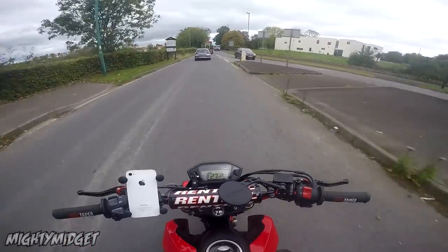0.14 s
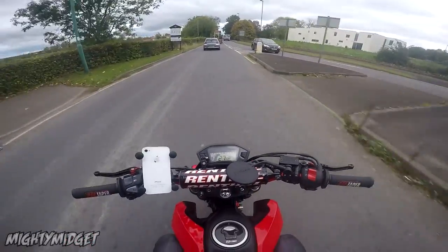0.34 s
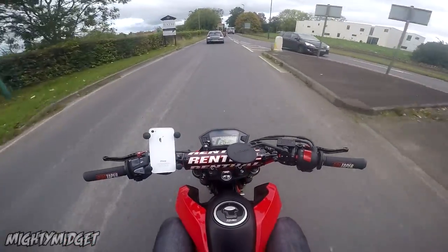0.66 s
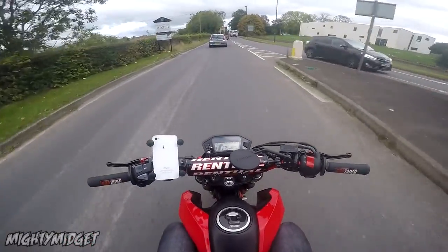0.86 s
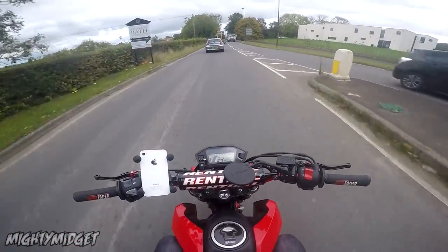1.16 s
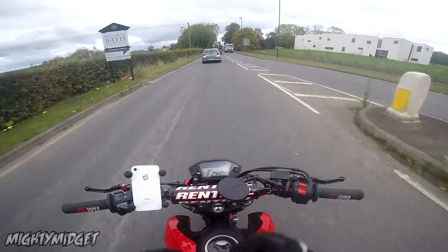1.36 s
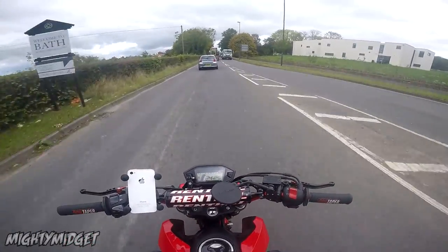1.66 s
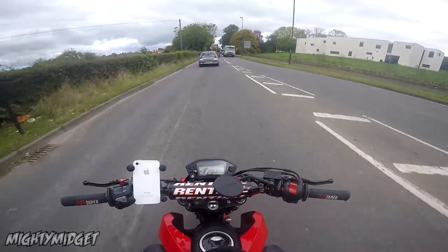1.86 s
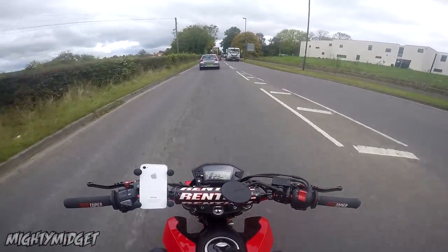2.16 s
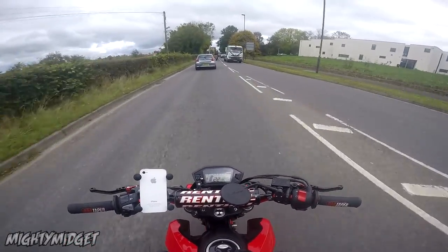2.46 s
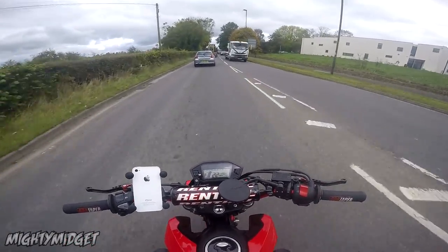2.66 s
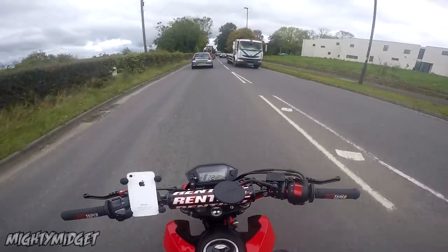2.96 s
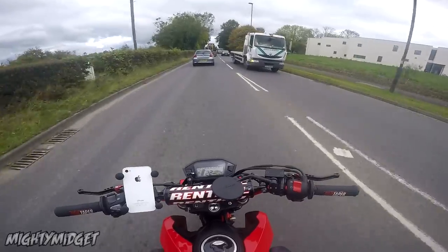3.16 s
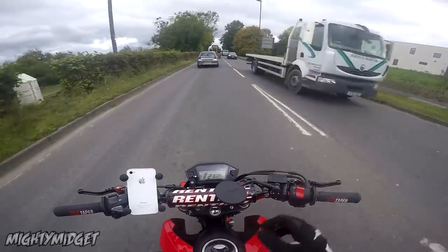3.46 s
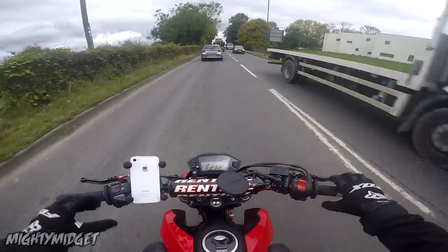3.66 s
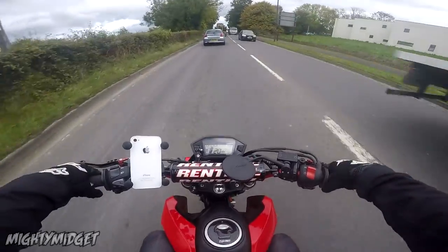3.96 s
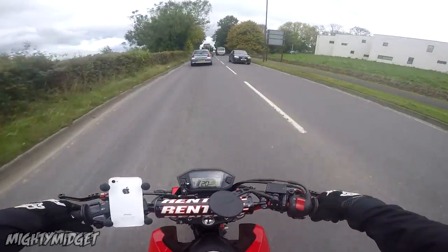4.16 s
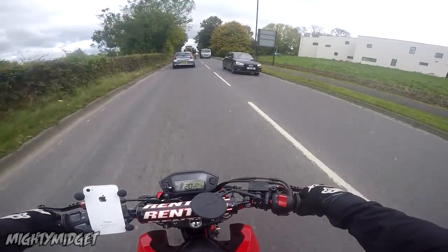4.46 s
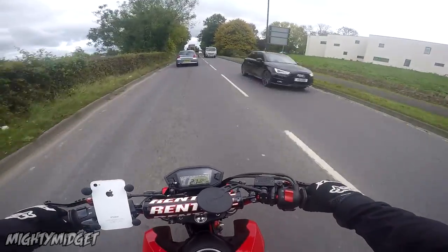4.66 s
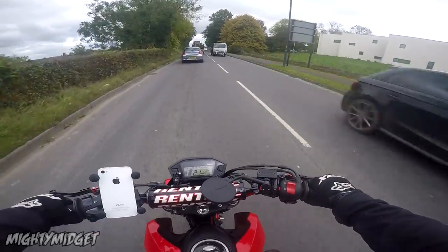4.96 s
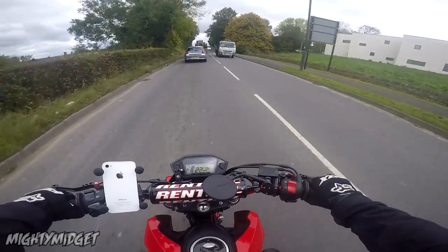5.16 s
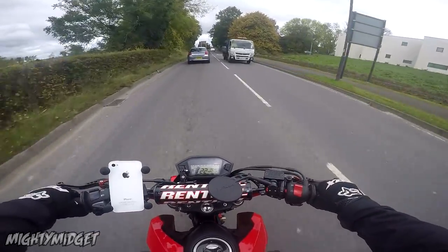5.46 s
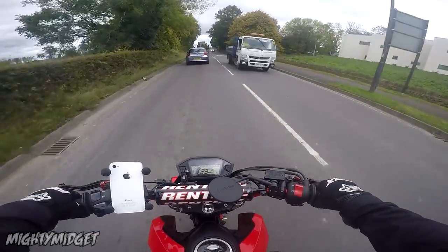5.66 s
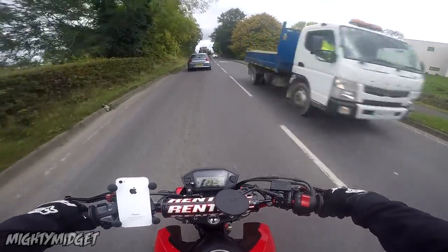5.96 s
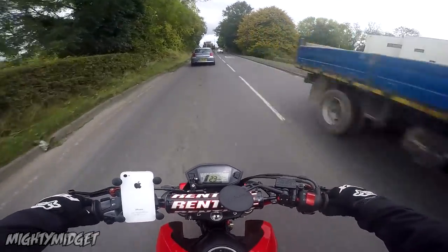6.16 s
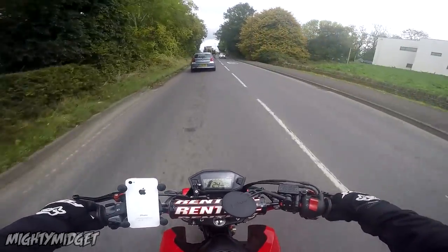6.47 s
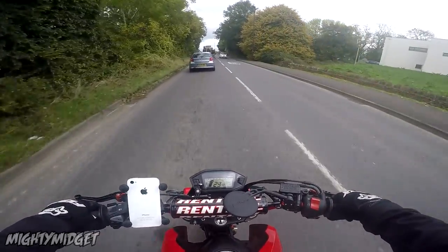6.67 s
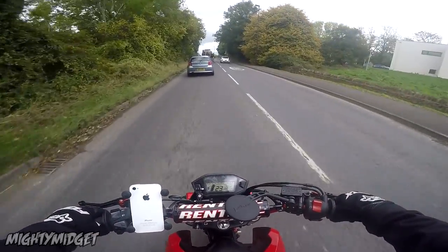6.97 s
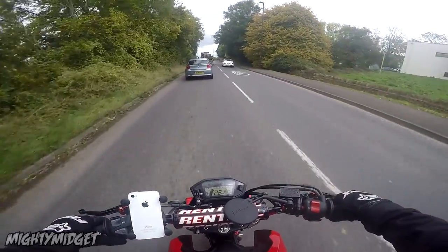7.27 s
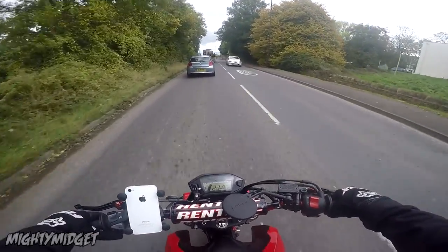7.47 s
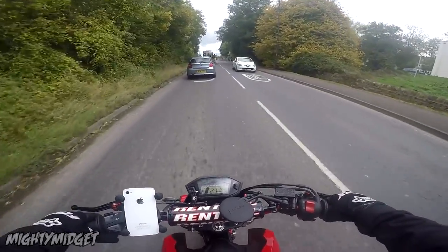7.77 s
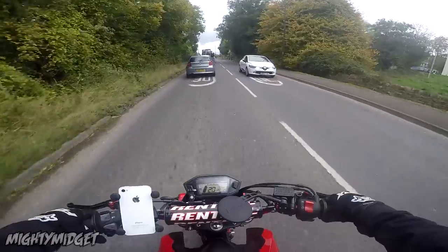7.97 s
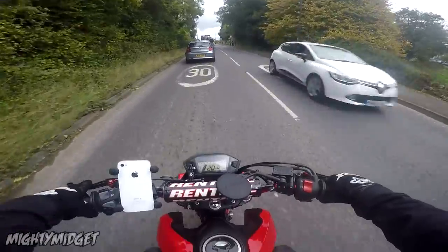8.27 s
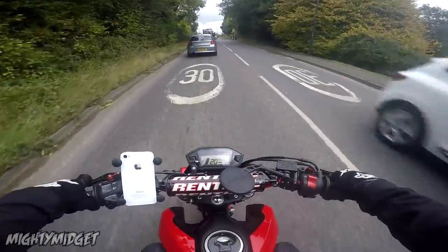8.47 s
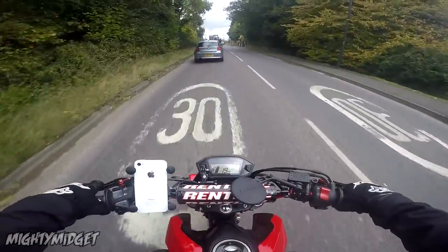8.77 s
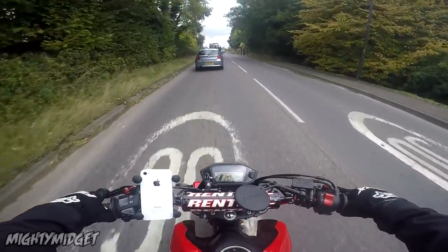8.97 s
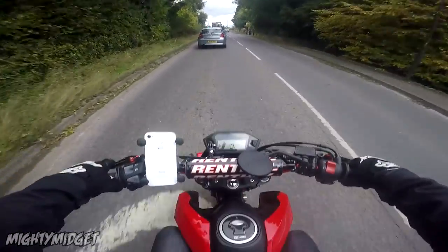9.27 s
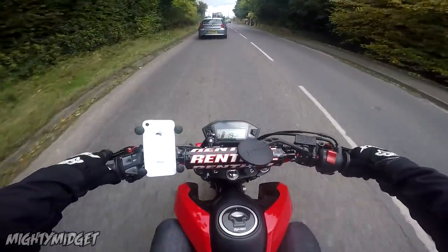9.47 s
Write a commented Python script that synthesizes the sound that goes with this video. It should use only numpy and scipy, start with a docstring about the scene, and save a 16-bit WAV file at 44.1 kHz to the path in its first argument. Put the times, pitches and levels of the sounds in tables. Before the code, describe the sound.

Onboard a small single-cylinder motorcycle with a loud pipe, outdoors on a road. From 0 to about 1.3 s it coasts with dense, cracking exhaust pops and strong low wind buffeting. Engine speed sags until 4.5 s, settling into hollow low thumps with scattered duller pops; gloves and jacket rustle on the left, mostly between 1.4 and 3.5 s. A vehicle whooshes past on the right around 3.7 s. At 4.55 s the throttle opens with a jerk: a hard, barking, raspy pull climbs in pitch until about 5.95 s, with a passing car near 5.1 s. It shuts off into burbling, popping overrun as another vehicle passes at 6.1 s. Speed falls until 8.4 s, one more car swishing by at 8.3 s. Short throttle blips at 8.4 and 8.65 s lead into a gentler pull to the end at 9.6 s. Tyre and air noise continue throughout.

```python
"""Small motorcycle, rider's ear

A single-cylinder engine with a loud pipe coasts, pulls hard, coasts and picks up again.
Each cycle thumps the pipe; firings and late-burn pops ring its modes, hiss gas and overload the microphones.
Shaped noise makes road, wind, oncoming vehicles, intake rasp and cloth rustle; a sine makes the gear whine."""
import sys
import numpy as np
from scipy import signal
from scipy.fft import rfft, irfft
from scipy.io import wavfile
from scipy.ndimage import uniform_filter1d

SR = 44100
rng = np.random.default_rng(int(sys.argv[2]) if len(sys.argv) > 2 else 0)


def wav_record(signal):
    """Record a signal, one row per channel, as 16-bit PCM in the file named by sys.argv[1]."""
    frames = np.transpose(np.atleast_2d(signal))
    bounded = np.clip(frames, -1, 1)
    # unit amplitude maps onto the largest positive 16-bit level
    quanta = np.round(bounded * 32767).astype(np.int16)
    wavfile.write(sys.argv[1], SR, quanta)


def natural_amplitude(level_db):
    """Convert a level in decibels to a linear amplitude factor, elementwise."""
    exponent = np.asarray(level_db, float) / 20
    return 10 ** exponent


N = 424240
TIME = np.arange(N) / SR
CRUISE_HZ = 27  # reference engine speed, cycles per s
FIRING_FLOOR_DB = -30  # weaker than this counts as shut throttle


def colour(x, points):
    """Shape noise by (frequency [Hz], relative level [dB]) points; rms 1."""
    hz, db = np.transpose(points)
    bins_hz = np.maximum(np.arange(N // 2 + 1) * SR / N, 1)
    y = irfft(rfft(x) * natural_amplitude(np.interp(np.log(bins_hz), np.log(hz), db)), N)
    return y / y.std()


def both(left, right, alike):
    """Two channels that share a part of their noise."""
    return np.array([left, alike * left + np.sqrt(1 - min(alike, 1) ** 2) * right])


def stereo_noise(points, alike):
    """Coloured noise in two partly shared channels."""
    left, right = (colour(rng.standard_normal(N), points) for _ in range(2))
    return both(left, right, alike)


def walk(rate_hz):
    """Random levels held 1 / rate_hz and slewed twice; spread near 1."""
    hold = int(SR / rate_hz)
    steps = np.repeat(rng.standard_normal(N // hold + 1), hold)
    return 1.3 * uniform_filter1d(uniform_filter1d(steps, hold), hold)[:N]


def pushes(times_s, sizes, push_ms):
    """A raised-cosine shove of gas centred on each time."""
    x, shape = np.zeros(N), np.hanning(int(push_ms * SR / 1000) + 3)
    at = (times_s * SR).astype(int)
    inside = (at >= 0) & (at < N)
    np.add.at(x, at[inside], sizes[inside])
    return signal.fftconvolve(x, shape / shape.sum(), "same")


def ring(x, hz, t60_s):
    """One decaying mode as radiated by an open end, which passes changes of flow only."""
    r, w = np.exp(-np.log(1000) / (t60_s * SR)), 2 * np.pi * hz / SR
    return signal.lfilter([1, -1], [1, -2 * r * np.cos(w), r * r], x)


def fade(x, fade_s):
    """Exponential tail after each push."""
    return signal.lfilter([1], [1, -np.exp(-1 / (fade_s * SR))], x)


# engine speed, sagging on coast, climbing under throttle: (time [s], speed [cycles/s])
SPEED_POINTS = [(0, 32.29), (.694, 30.52), (1.001, 29.4), (1.972, 27.55), (3.888, 24.66), (4.498, 23.88),
                (4.916, 25.23), (5.682, 28.27), (6.26, 28.12), (6.526, 27.13), (7.538, 24.82),
                (8.462, 23.51), (8.574, 22.5), (8.869, 24.71), (9.084, 22.9), (9.62, 23.55)]
# chain slack taken up with a jerk of the crank: (time [s], undamped swing [cycles/s])
CHAIN_SNATCHES = [(4.545, 8.46), (6.038, -8.92), (8.904, -4.78)]


def speed():
    """Cycles per second, with a quick damped swing at each snatch."""
    swing_hz, decay_s = 3.086, .048
    rate = np.interp(TIME, *np.transpose(SPEED_POINTS))
    for start_s, size in CHAIN_SNATCHES:
        since = np.maximum(TIME - start_s, 0)
        rate = rate + size * np.sin(2 * np.pi * swing_hz * since) * np.exp(-since / decay_s)
    return rate


def thump(cycle, rate, fire_db, pop, jitter_db):
    """Broad gas push every cycle, growing with speed and pops, softened by open throttle."""
    base_db, db_per_hz, open_db = -10, 0.37, -2.5
    level_db = base_db + db_per_hz * (np.interp(cycle, TIME, rate) - CRUISE_HZ)
    level_db = level_db + jitter_db + open_db * (fire_db > FIRING_FLOOR_DB)
    return pushes(cycle - .0062, natural_amplitude(level_db) * (1 + 2.6 * pop), push_ms=9.41)


# leftover fuel burning off throttle, louder cracks: (time [s], relative level [dB])
LOUD_POPS = [(.015, -15.5), (.077, -12.5), (.107, -15), (.233, -14), (.328, -13.5), (.361, -15),
             (.424, -11.5), (.52, -13), (.65, -15.5), (.683, -16.5), (.748, -13.5), (.782, -18),
             (.848, -14), (.95, -15), (1.051, -16.5), (1.084, -16), (1.153, -17.5), (1.292, -21),
             (1.536, -19), (1.677, -19.5), (2.0, -19), (2.11, -21.5), (2.22, -20), (2.332, -21.5),
             (2.444, -24), (2.593, -20), (2.82, -21.5), (3.204, -22), (3.439, -20), (3.719, -19),
             (3.799, -20), (4.043, -20.5), (5.999, -19.5), (6.222, -20.5), (6.397, -19), (6.55, -19),
             (6.731, -16), (6.847, -18), (7.0, -19.5), (7.151, -19.5), (7.231, -20), (7.712, -21),
             (7.834, -21), (8.082, -20.5), (8.205, -21.5), (8.249, -22), (8.461, -19.5), (8.592, -19.5),
             (8.635, -19.5)]


def late_burns(cycle, rate, fire_db, faint_jitter_db, stray_jitter_db):
    """Pop strength per cycle: most coasting cycles burn faintly, some catch late with a crack."""
    stray_share, stray_db, faint_db, faint_db_per_hz = .2, -21.5, -27, 0.6
    stray = rng.random(len(cycle)) < stray_share
    faint = faint_db + faint_db_per_hz * (np.interp(cycle, TIME, rate) - CRUISE_HZ) + faint_jitter_db
    pop = natural_amplitude(np.where(stray, stray_db + stray_jitter_db, faint))
    # a clean firing leaves no fuel behind
    pop *= (fire_db < FIRING_FLOOR_DB) & (np.roll(fire_db, 1) < FIRING_FLOOR_DB)
    for time_s, db in LOUD_POPS:
        pop[np.argmin(abs(cycle + .005 - time_s))] = natural_amplitude(db)
    return pop


# pipe modes, relative levels: (frequency [Hz], t60 [s], burn arrival [ms], thump [dB], firing [dB],
# pop [dB], right ear [dB], right ear lag [ms], growth [dB per dB of firing])
PIPE_MODES = [(55, 0.073, 0.12, -9, -36, -40.5, -3, .1, 0.5),
              (98.3, 0.054, 1.2, 12, -11.5, -20.5, -4.5, .1, 2),
              (141.6, 0.03, 0.55, -10.5, -0.5, -7, -1.5, .2, 2.5),
              (250.2, 0.027, 0.085, -18, 3, 5, -7, 0.1, 1.86),
              (305.1, 0.063, 0.54, -8, -13, -5, 1, 0.44, 4),
              (346.2, 0.068, 0.48, -25.5, -11, -19, -4, 0.63, 2),
              (453, 0.019, 0.71, -27, -3.5, -21, 0.5, 0.22, 7),
              (563, 0.038, 1.4, -28.5, -2, -6, -6.5, 0.26, 5.5),
              (697.4, 0.034, 3.16, -42, -22.5, -5, -6.5, 0.27, 2.5),
              (746, 0.035, 2.1, -42.5, -8, -14, -6.5, .4, 8),
              (860, 0.0068, 1.6, -47.5, -8, -28, -5, .4, 6.5),
              (1004, 0.034, 2.054, -32.5, -10, -10, -1, 0.63, 7.5),
              (1293, 0.039, 1.2, -46.5, -14.5, -19, -5, .4, 5.5),
              (1642, 0.012, 0.73, -54.5, -18, -26.5, -9, 0.1, 6)]


def pipe(cycle, firing, fire_db, pop, thumps):
    """Modes rung by thumps and pops, and apart by firings; stronger burns have steeper fronts."""
    pivot, bite = natural_amplitude(-17), 0.37  # bite: extra pop growth per octave, so bigger pops are brighter
    scatter_db = 2.3  # no two pops ring the modes alike
    out, fired = np.zeros((2, 2, N))
    for hz, t60_s, arrives_ms, thump_db, firing_db, pop_db, right_db, lag_ms, growth in PIPE_MODES:
        push_ms = min(620 / hz, 3.)  # low modes get a longer push
        lag, right = int(lag_ms * SR / 1000), natural_amplitude(right_db)
        fire = pushes(firing + arrives_ms / 1000, -natural_amplitude(fire_db * growth + 5.5), push_ms)
        power = max(1 + bite * np.log2(hz / 450), .5)
        scatter = natural_amplitude(scatter_db * rng.standard_normal(len(cycle)))
        pop_sizes = -1.9 * scatter * pivot * (pop / pivot) ** power
        pops = pushes(cycle - .0028 + 1.42 * arrives_ms / 1000, pop_sizes, push_ms)
        mode = ring(natural_amplitude(thump_db) * thumps + natural_amplitude(pop_db) * pops, hz, t60_s)
        bang = ring(natural_amplitude(firing_db) * fire, hz, t60_s)
        out += mode, right * np.roll(mode, lag)
        fired += bang, right * np.roll(bang, lag)
    return out, fired


def exhaust_gas(cycle, firing, fire_db, pop):
    """Hot gas hisses after the valve opens; late burns hiss duller, hard firings trail a rasp."""
    growth, fade_s, tail_s, pop_cutoff_hz = 6, .007, .015, 2500  # growth: dB per dB of firing
    jet = [(100, -13), (300, -4.0), (700, -0.5), (1500, -15.0), (1900, -22.0), (2600, -27.5),
           (3600, -39), (6000, -47.5), (16000, -81.0)]
    tail = [(500, -20), (1000, -0.5), (2000, -6.5), (3200, -16.5), (8000, -44.5)]
    blast = pushes(firing + 0.0036, natural_amplitude(growth * fire_db), push_ms=1.9)
    pop_blast = pushes(cycle + 0.0031, 0.96 * pop, push_ms=6.3)
    noise = stereo_noise(jet, alike=0.047)
    dull = signal.butter(2, pop_cutoff_hz, fs=SR, output="sos")
    gas = fade(blast, fade_s) * noise + signal.sosfilt(dull, fade(pop_blast, fade_s) * noise)
    gas = gas + natural_amplitude(-32) * fade(blast, tail_s) * stereo_noise(tail, alike=0.3)
    return natural_amplitude(-12.5) * gas


def gear_whine(phase):
    """Forty gear teeth meshing per cycle, as a wavering sine."""
    whine = natural_amplitude(-64 + 3 * walk(8)) * np.sin(2 * np.pi * 40 * phase)
    return whine * np.array([[1], [.3]])


def engine(rate):
    """Crank phase times every thump, pop and firing; the silencer filters the ringing pipe."""
    first_cycle, packing_hz = .35, 1660
    phase = np.cumsum(rate) / SR - first_cycle
    cycle = np.interp(np.arange(-1, int(phase[-1]) + 1), phase, TIME)
    fire_jitter, faint_jitter, jitter = rng.standard_normal((3, len(cycle))) * [[.2], [2.5], [.6]]  # dB
    firing = firing_times(cycle)
    fire_db = throttle_db(firing + 0.0018) + fire_jitter
    pop = late_burns(cycle, rate, fire_db, faint_jitter, jitter)
    thumps = thump(cycle, rate, fire_db, pop, jitter)
    out, fired = pipe(cycle, firing, fire_db, pop, thumps)
    packing = signal.butter(3, packing_hz, fs=SR, output="sos")  # silencer wool soaks up treble
    exhaust = signal.sosfilt(packing, out + cancel(fired))
    return exhaust + exhaust_gas(cycle, firing, fire_db, pop) + intake_rasp() + gear_whine(phase)


# tyre and air noise: (frequency [Hz], relative density [dB per Hz])
ROAD_COLOUR = [(45, -3), (100, -8.5), (220, -9), (450, -17.5), (700, -26), (1600, -40.5), (1900, -38.5),
               (2100, -44), (2350, -47), (2570, -49), (2800, -55), (3400, -54.5), (5000, -65.5),
               (9000, -73), (12500, -73.5), (16000, -83)]


def road(rate):
    """Tyre and air noise in four ranges that flutter apart and follow speed and load unequally."""
    db_per_hz, load_db, load_power = 0.64, 4.5, 6.4
    load = uniform_filter1d(natural_amplitude(throttle_db(TIME)) ** load_power, size=SR // 10)
    drive_db = db_per_hz * (rate - CRUISE_HZ) + load_db * load
    drive_db = drive_db - drive_db.mean()
    left, right = (colour(rng.standard_normal(N), ROAD_COLOUR) for _ in range(2))
    # (edges [Hz], channel likeness, flutter [dB], share of drive_db followed)
    ranges = [((40, 250), .8, 1.2, .2), ((250, 1200), .4, 1.2, .6),
              ((1200, 4500), .4, .8, .9), ((4500, 15500), .6, 2.2, .05)]
    out = 0
    for edges_hz, alike, flutter_db, follow in ranges:
        sos = signal.butter(2, edges_hz, "band", fs=SR, output="sos")
        band = signal.sosfilt(sos, both(left, right, alike))
        out = out + band * natural_amplitude(flutter_db * walk(13) + follow * drive_db)
    return natural_amplitude(-22.5) * out * natural_amplitude([[1.2], [-1.2]])


# wind on the microphones: (time [s], mean level [dB])
WIND_LEVEL = [(0, -26), (1.5, -42.5), (2.6, -40), (4.1, -41.5), (4.9, -32), (5.8, -32), (6.3, -40.5),
              (8.2, -36.5), (9.62, -42.5)]


def wind():
    """Slow buffeting straight on the microphones."""
    buffet = [(10, -3.5), (25, 13.0), (50, -1.5), (80, -28.5), (200, -56.5), (1500, -120)]
    level_db = np.interp(TIME, *np.transpose(WIND_LEVEL)) + 3.5 * walk(1.8)
    return natural_amplitude(level_db) * stereo_noise(buffet, alike=.6) * natural_amplitude([[-1], [1]])


# cloth on cloth, relative levels: (time [s], length [s], dull [dB], bright [dB])
CLOTH_RUBS = [(.03, .05, -62, -63), (.34, .03, -75, -71), (.49, .04, -75, -71), (1.41, .07, -68, -66),
              (1.53, .08, -59, -63), (1.64, .06, -62, -73), (1.78, .13, -66, -74), (2.01, .05, -65, -74),
              (2.14, .07, -73, -71), (2.3, 1.6, -73, -93), (2.49, .1, -63, -74), (2.65, .04, -65, -76),
              (2.8, .14, -67, -76), (2.95, .04, -64, -76), (3.0, .04, -62, -73), (3.12, .06, -61, -70),
              (3.22, .05, -65, -74), (3.45, .05, -72, -65), (3.82, .04, -74, -66), (7.0, .05, -78, -73),
              (7.31, .03, -68, -64), (8.07, .03, -78, -72)]


def rustle():
    """Grainy rubs of gloves and jacket, each a mix of a dull and a bright scratch."""
    dull = [(1200, -22), (2400, -2), (4000, 0), (5000, -6), (6000, -14), (9000, -26)]
    bright = [(3000, -25), (6000, -5), (10000, 0), (12500, -7), (16000, -14)]
    out = 0
    for column, shape in [(2, dull), (3, bright)]:
        rub = sum(natural_amplitude(row[column]) * np.exp(-(1.9 * (TIME - row[0]) / row[1]) ** 2) for row in CLOTH_RUBS)
        out = out + rub * natural_amplitude(2.1 * walk(150)) * stereo_noise(shape, alike=0.67)
    return out * natural_amplitude([[2.5], [0.1]])


# oncoming vehicles: (time abreast [s], relative level [dB], swell [s])
ONCOMING = [(3.68, -39.5, 0.29), (5.103, -41.5, 0.83), (6.122, -40, 0.19), (8.32, -39, 0.33)]


def traffic():
    """Tyre roar and hiss of each vehicle swell and fade, louder on the right."""
    roar = [(150, -15.0), (500, 22.0), (1000, 11.0), (1600, 4.0), (2100, -6), (2500, -12.0),
            (3300, -21.0), (4000, -21.0), (8000, -45.5), (16000, -69.0)]
    hiss = [(700, -18.5), (1500, 1.5), (2300, -4), (3200, -16.5), (6000, -40)]
    swell = close = 0
    for time_s, db, width_s in ONCOMING:
        spread = 1 + ((TIME - time_s) / width_s) ** 2
        swell = swell + natural_amplitude(db) / spread ** 0.84
        close = close + natural_amplitude(db - 13) / spread ** 2.7  # hiss carries less far: sharper peak
    noise = swell * stereo_noise(roar, alike=0.64) + close * stereo_noise(hiss, alike=0.55)
    return noise * natural_amplitude([[-3], [2.5]])


# throttle openings: (opens [s], shuts [s], firing strength [dB], softer at first by [dB])
THROTTLE_OPENINGS = [(4.551, 5.953, 0, 2.5), (8.402, 8.408, 1, 3.5), (8.653, 8.696, 3.5, 4),
                     (8.731, 10.186, -3.5, 2.43)]


def throttle_db(t):
    """Firing strength: soft at first, building, then easing as the grip rolls back."""
    shut_db, build_s, ease_db, ease_s = -60., 0.51, 5.5, 0.14
    db = np.full(len(t), shut_db)
    for opens, shuts, full_db, build_db in THROTTLE_OPENINGS:
        now = (t >= opens) & (t < shuts)
        build = build_db * np.exp((opens - t[now]) / build_s)
        db[now] = full_db - build - ease_db * np.exp((t[now] - shuts) / ease_s)
    return db


# firing advance under load, negative is late: (time [s], advance [ms])
FIRING_ADVANCE = [(4.61, 0), (4.64, 4), (4.67, 0), (4.76, 1), (4.88, 2.5), (5.1, 2), (5.3, .5), (5.6, -.5),
                  (5.9, 0)]


def firing_times(cycle):
    """Firing 11 ms ahead of the cycle mark, shifted by the advance."""
    nominal = cycle - .011
    return nominal - np.interp(nominal, *np.transpose(FIRING_ADVANCE)) / 1000


# ranges cancelled in the blast of a firing: (frequency [Hz], width [Hz])
BLAST_NULLS = [(510, 60), (685, 35), (1230, 90), (1880, 150)]


def cancel(fired):
    """Notch the firing blast; gentle firings also lose a range just above the purr."""
    gentle_hz, gentle_width_hz, gentle_below_db = 440, 110, -3.2
    for hz, width_hz in BLAST_NULLS:
        fired = signal.lfilter(*signal.iirnotch(hz, hz / width_hz, SR), fired)
    gentle = uniform_filter1d(1. * (throttle_db(TIME) < gentle_below_db), size=SR // 20)
    peak = signal.iirpeak(gentle_hz, gentle_hz / gentle_width_hz, SR)
    return fired - gentle * signal.lfilter(*peak, fired)


def intake_rasp():
    """Narrow intake hiss while the throttle is open."""
    hz, width_hz, level_db = 1860, 130, -60
    opened = uniform_filter1d(1. * (throttle_db(TIME) > FIRING_FLOOR_DB), size=SR // 10)
    hiss = signal.lfilter(*signal.iirpeak(hz, hz / width_hz, SR), rng.standard_normal((2, N)))
    return natural_amplitude(level_db + 2 * walk(25)) * opened * hiss / hiss.std()


def scene():
    """Engine close below, road, wind and traffic around, cloth next to the microphones."""
    rate = speed()
    low_cut = signal.butter(4, 71.7, "high", fs=SR, output="sos")  # small outlet: little deep bass
    ride = signal.sosfilt(low_cut, engine(rate) + road(rate))
    return ride + wind() + rustle() + traffic()


def low_pass(x):
    """Removes everything above the highest recorded frequency."""
    return signal.sosfilt(signal.butter(12, 15800, fs=SR, output="sos"), x)


def record(dry):
    """Peaks beyond full scale are cut flat."""
    mix = np.clip(dry, -1, 1)
    return low_pass(mix)


dry = scene()
out = record(dry)
wav_record(out)
```